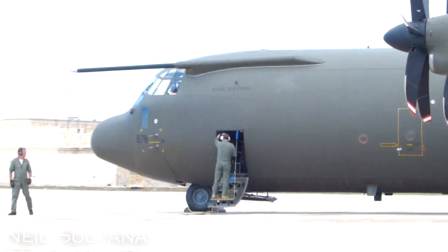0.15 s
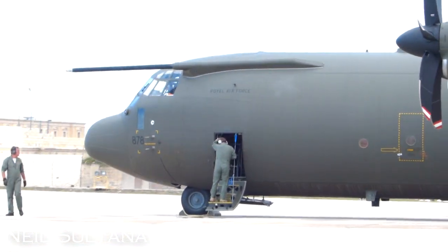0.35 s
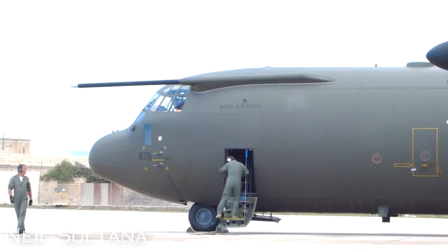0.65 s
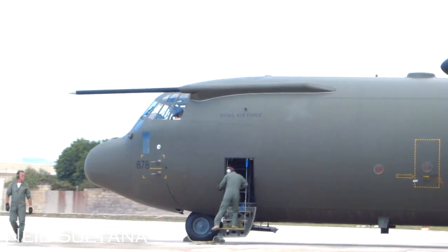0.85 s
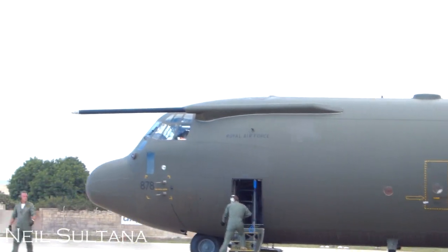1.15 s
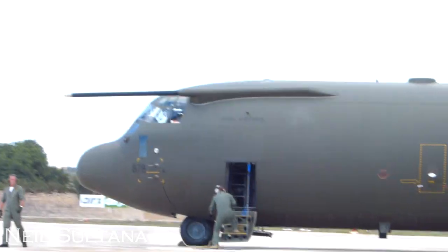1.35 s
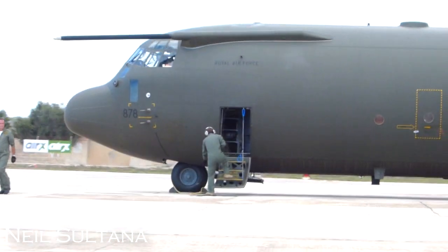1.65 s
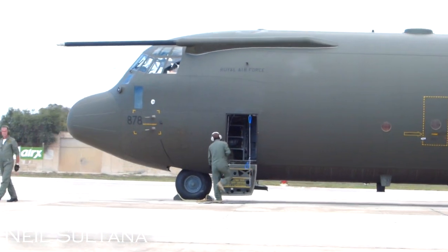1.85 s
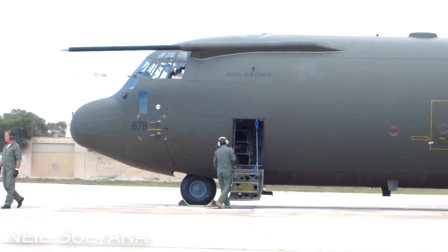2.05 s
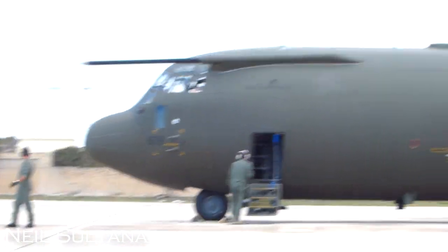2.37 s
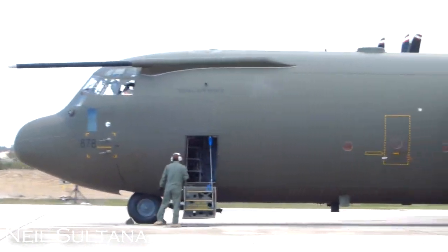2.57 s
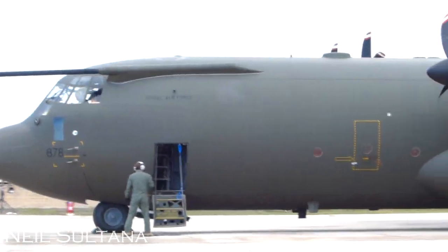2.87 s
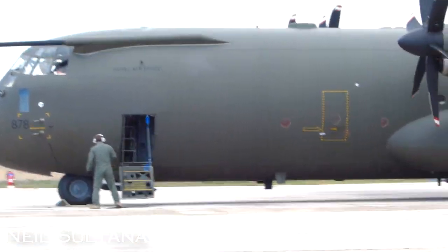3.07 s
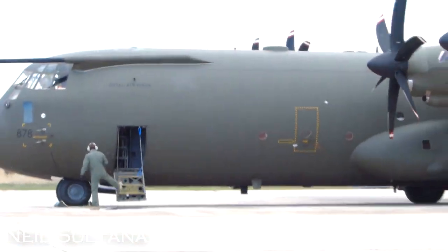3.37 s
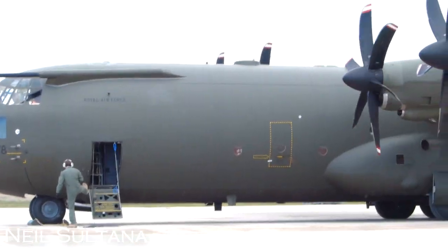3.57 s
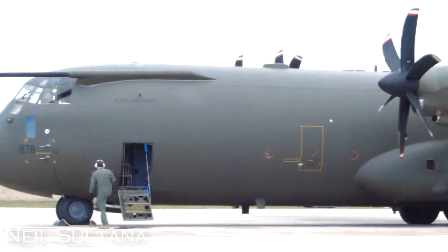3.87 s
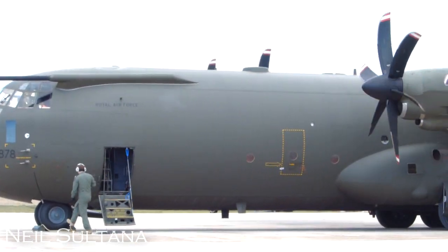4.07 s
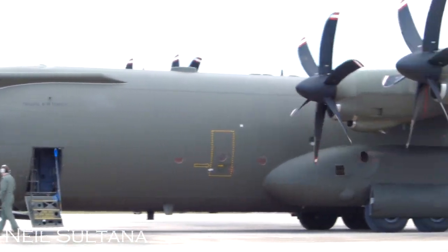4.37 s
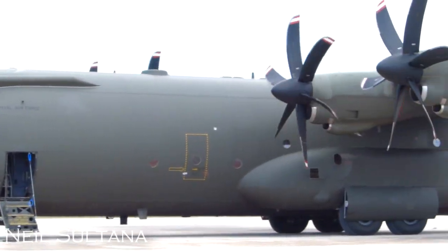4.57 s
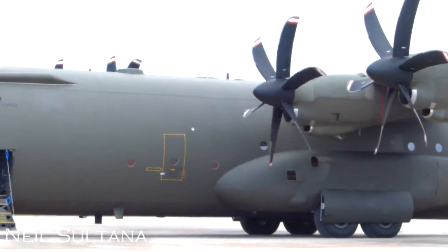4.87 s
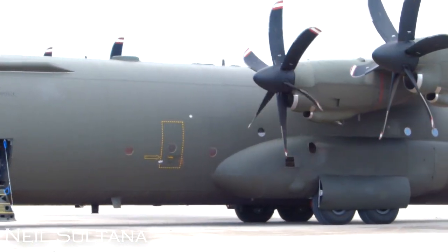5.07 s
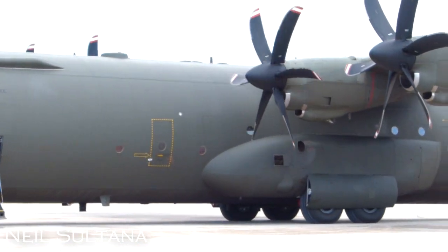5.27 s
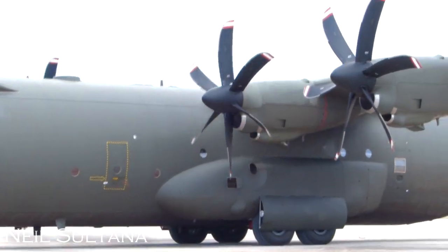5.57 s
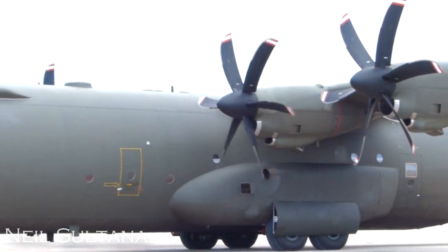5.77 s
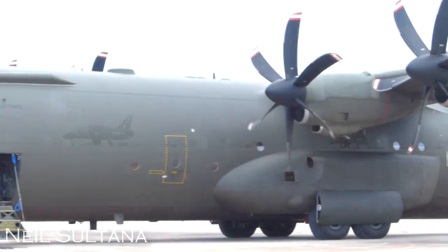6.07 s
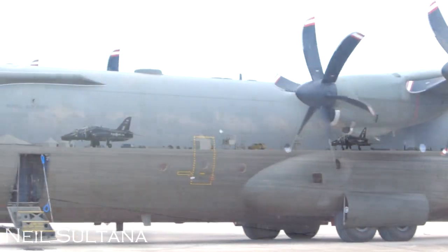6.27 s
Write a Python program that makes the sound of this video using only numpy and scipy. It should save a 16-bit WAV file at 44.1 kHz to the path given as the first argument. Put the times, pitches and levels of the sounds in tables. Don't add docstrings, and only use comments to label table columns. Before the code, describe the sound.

Continuous idling turbine noise outdoors: several shrill, shimmering tones close together, wind-stirred hiss, dense casing noise and a soft low roar. Individual whistles briefly jump out and sink back as warm air drifts. Low hums swell faintly. Near the end it dissolves partly into a second, closer jet with fuller noise and piercing steady whistles. Open apron, single microphone, almost centred, little stereo width, no echoing room.

```python
import sys
import numpy as np
from scipy import signal
from scipy.fft import rfft, irfft, next_fast_len
from scipy.io import wavfile
from scipy.ndimage import uniform_filter1d

SR = 44100
rng = np.random.default_rng(int(sys.argv[2]) if len(sys.argv) > 2 else 0)


def store_wav(level_fs):
    pcm = np.round(np.clip(np.atleast_2d(level_fs), -1, 1) * 32767)
    wavfile.write(sys.argv[1], SR, pcm.T.astype(np.int16))


def undo_db(level):
    steps = np.asarray(level, float) / 20
    return 10 ** steps


N = 283563
T_S = np.arange(N) / SR
HOP = 256
WINDOW = 4 * HOP
HZ = np.maximum(np.arange(2 * HOP + 1) * SR / WINDOW, 10)[:, None]
FRAMES_S = np.arange(N // HOP + 2) * HOP / SR

# t/s, view (0 nose - 1 abeam exhaust)
VIEW = [
    (0, 0.18),
    (1.3, 0.067),
    (2.6, 0.23),
    (3.5, 0.21),
    (4.4, 0.57),
    (5.4, 0.71),
    (5.93, 1.0),
    (6.43, 0.44),
]
# t/s, f/Hz
BLADE_HZ = [(0, 10692), (.44, 10687), (.88, 10673), (1.32, 10675), (1.76, 10669), (2.2, 10665),
            (2.64, 10669), (3.08, 10683), (3.52, 10690), (3.96, 10694), (4.4, 10701), (4.84, 10704),
            (5.28, 10709), (5.72, 10702), (6.43, 10699)]
# multiple, level at nose/dB, gain abeam/dB, scatter
STEADY = [(1, -62, 1, 0.39), (2, -52, 7, 0.58), (3, -50.5, 4.5, 0.55), (7, -52.5, -5, 0.66),
          (8, -41, -3.5, 0.52), (9, -39, -1, .6), (10, -36.5, -3.5, 0.54)]
# multiple, level/dB
UPPER = [(11, -47), (12, -54), (13, -65)]
# t/s, multiple, peak level/dB, length/s
FLARES = [(1.9, 7, -29.5, 0.18), (2.45, 7, -35, 0.24), (2.86, 7, -30, 0.067), (3.15, 7, -34, 0.24),
          (3.62, 7, -35, 0.15), (3.98, 7, -31, 0.23), (5.15, 7, -35, 0.41), (5.8, 7, -32, 0.26),
          (6.2, 7, -33, 0.33), (.01, 8, -22, 0.087), (.3, 8, -31, 0.2), (.55, 8, -30, 0.17),
          (.88, 8, -48, .1), (1.25, 8, -36, 0.33), (1.68, 8, -30, 0.23), (2.53, 8, -32, 0.3),
          (2.9, 8, -32, 0.16), (3.57, 8, -39, 0.17), (4.87, 8, -43, 0.29), (5.34, 8, -28, 0.26),
          (6.25, 8, -31, 0.38), (1.3, 9, -46, 0.25), (1.6, 9, -31, 0.25), (2.09, 9, -34, 0.046),
          (2.48, 9, -29, 0.39), (2.95, 9, -25.5, 0.11), (3.19, 9, -26.5, 0.092), (3.65, 9, -34, 0.38),
          (4.18, 9, -55, 0.073), (5.94, 9, -27, 0.05)]
# t/s, multiple, peak level/dB, length/s
LOW_FLARES = [(0.255, 1, -44, .2), (.95, 1, -51, .2), (1.51, 1, -43.5, 0.17), (2.702, 1, -47, 0.33),
              (.1, 2, -43, 0.14), (1.47, 2, -43, 0.11), (2.198, 2, -46, .4), (4.25, 2, -39.5, 0.18),
              (4.846, 2, -41.5, 0.75), (5.645, 2, -38, 0.11), (5.973, 2, -37, 0.21), (0.448, 3, -40, .12),
              (2.005, 3, -38, 0.48), (2.45, 3, -38, .2), (3.05, 3, -35.5, 0.4), (3.8, 3, -42, .25),
              (4.35, 3, -44, .3)]
# t/s, peak level/dB, length/s
BLADE_FLARES = [(.01, -30, .1), (0.22, -25.5, 0.11), (0.435, -25, 0.053), (0.827, -36, 0.31),
                (1.334, -36.5, .1), (1.56, -34, 0.16), (2.394, -38, 0.16), (3.422, -25.5, 0.11),
                (3.72, -34, 0.3), (4.03, -25, 0.18), (4.22, -40, 0.049), (4.43, -35, 0.12),
                (1.04, -27, 0.077), (4.605, -30, 0.064), (4.783, -27.5, 0.37), (5.177, -24, 0.11),
                (5.41, -23.5, 0.097), (6.132, -27, 0.23)]
# t/s, peak level/dB, length/s
GEAR_SWELLS = [
    (.9, -55, .9),
    (2.75, -50, .3),
    (4.3, -46, .6),
    (5.72, -46, .35),
]
# t/s, f/Hz, peak level/dB, length/s
HUM_SWELLS = [(0.306, 506.5, -46, 0.96), (0.94, 506.5, -48.5, 0.34), (3.8, 506.5, -50, 0.31),
              (5.75, 506.5, -48, 0.62), (0.653, 712, -46.5, 0.32), (1.703, 712, -53.5, 1.3),
              (2.91, 712, -51.5, 0.75), (3.765, 712, -44.5, 0.27), (5.763, 712, -54.5, 0.37),
              (.48, 476.5, -47, 0.14), (0.776, 476.5, -36.5, 0.11), (1.32, 476.5, -48, 0.45),
              (2.502, 476.5, -52, 0.75), (3.506, 476.5, -58, 0.38), (4.405, 476.5, -48.5, 0.093),
              (6.045, 476.5, -56, 0.38)]
# f/Hz, level/dB per Hz
ROAR_COLOUR = [(35, -73), (60, -59), (138, -14.5), (172, -14.5), (256, -1.5), (346, -7.5), (488, 0),
               (542, -2.5), (724, -4), (918, -4), (1080, -7), (1210, -19), (1400, -23), (1820, -40),
               (3080, -120)]
# f/Hz, width/Hz, level/dB
PIPE = [(143, 24, 7), (182, 14, -6), (203, 9.8, 5), (261, 16, 5.5), (343, 44, -1.5), (637, 20, -1.5),
        (909, 27, -18), (926, 30, -2)]
# f/Hz, level/dB per Hz
CASING_COLOUR = [(710, -66), (1200, -22.5), (1700, -5.5), (1950, -4), (2220, -5.5), (2560, -5), (3100, -3),
                 (4490, -2.5), (6600, -4), (8580, -9), (14500, -120)]
CASING_ABEAM_DB = (9, -1.5, 4.5)
# f/Hz, width/Hz, level/dB
PANELS = [(2766, 40, 5.5), (3260, 110, -0.5)]
# f/Hz, width/Hz, level/dB
DARK = [(946, 17, -2.5), (1194, 24, -13), (1947, 57, -6), (2320, 41, 3.5)]
# t/s, lag/ms, strength (0-1)
GROUND = [(0, 0.39, 0.05), (1.2, 0.31, 0.04), (2.0, 0.43, 0.2), (2.6, 0.34, 0.21), (3.4, 0.32, 0.26),
          (4.3, 0.34, 0.25), (5.3, 0.36, 0.2), (6.0, 0.38, 0.12), (6.43, 0.5, 0.27)]
# start t/s, end t/s, start f/Hz, end f/Hz, level/dB
COMBS = [(-0.5, 0.37, 1350, 1300, 15), (0, 1.26, 1660, 1680, 7), (0, 1.5, 3040, 3050, 9.5),
         (0, 1.5, 2430, 2740, -11), (0.5, 2.9, 2620, 2620, -10), (1.1, 1.14, 2350, 2400, 8),
         (1.85, 2.42, 1610, 1620, 9.5), (2.2, 2.47, 2930, 3110, 11), (2.1, 2.65, 2290, 2420, 7),
         (2.6, 3.5, 2420, 2420, 10.5), (0.2, 1.1, 1350, 1330, 9), (4, 5.2, 1250, 1300, -3),
         (4.5, 5.2, 1830, 1700, 4), (0.5, 0.55, 1940, 1670, -7), (4, 4.95, 1750, 1800, 5.5),
         (1.5, 2.9, 2750, 2870, -11), (2.45, 3.22, 1060, 1170, 9), (3, 4.2, 3100, 3070, 7),
         (3.5, 5, 2270, 2250, 7), (5.45, 6.9, 2265, 2240, 9), (3, 3.7, 1650, 1540, -5),
         (2, 4.2, 1900, 1930, -9), (4.5, 6.1, 2010, 1900, -6), (5.1, 6.5, 2400, 2400, -5),
         (0.6, 0.91, 2790, 2760, 6), (2, 2.3, 2740, 2800, 5), (2, 3.6, 2300, 2690, -7),
         (5, 6.2, 1940, 1770, 3.5), (5.3, 5.9, 2700, 2690, 4), (-1.5, 1, 3740, 3770, 8),
         (2, 1.6, 4600, 3900, 6), (2, 3.8, 4100, 3770, 6), (3, 3.05, 3000, 5300, 6),
         (1, .95, 4150, 4280, 9), (0.1, 1.5, 3330, 3440, 5.5), (2, 2.85, 1850, 1840, 4),
         (6, 7.3, 1200, 1200, 6), (5, 3, 2790, 2800, 6), (2, 2.9, 3600, 3660, 5)]
# start t/s, end t/s, f/Hz, width/Hz, level/dB
SHADES = [(1.2, 1.56, 3900, 290, 8), (1.1, 1.7, 4240, 320, -6), (1.8, 2.24, 3870, 360, -4.5),
          (0.5, 3.7, 4600, 230, -3.5), (4.5, 6.07, 3470, 380, -3.5), (4.5, 8.1, 2650, 200, 2.5),
          (-2, 1.25, 5200, 350, 8), (2, 2.82, 4900, 400, 3), (4.5, 5.3, 5400, 450, 4),
          (5, .6, 3100, 570, 5), (6, 6.2, 2150, 130, 1.5), (3.05, 3.39, 6400, 1900, 5),
          (0.5, 1.63, 140, 290, 3), (4, 6.05, 996, 150, -12), (0.5, 0.33, 1600, 560, 5),
          (0.5, 1.5, 2850, 320, -3.5), (0, 0.52, 650, 260, 6), (6, 6.1, 560, 700, 2.5),
          (5.0, 5.55, 4500, 120, -7), (3.8, 4.6, 3500, 130, -4), (5.5, 6.25, 3900, 520, -4),
          (1, 0.94, 2880, 200, 2.5), (1, 2.45, 2720, 290, 3.5), (4.2, 4.8, 3050, 90, 6),
          (5.0, 5.8, 400, 800, -3), (.5, 1.1, 5360, 300, -3), (3.5, 3.5, 2920, 100, -5),
          (5.7, 6.5, 1140, 180, 5), (4.5, 6.0, 5860, 620, -4.5), (5, 7.7, 4850, 330, 2),
          (1, 1.03, 4200, 1000, 3), (-0.3, 2.1, 2700, 400, 3)]
# f/Hz, level/dB per Hz
HISS_COLOUR = [(3530, -38.5), (6000, -18.5), (7100, -8), (8290, -1), (9900, -1.5), (10350, -2.5),
               (10800, 2), (11200, -5.5), (13200, -12), (15600, -26)]
# start t/s, end t/s, f/Hz, width/Hz, level/dB
HISS_SHADES = [(5, 6.1, 14300, 1600, 5), (0, 2.2, 14500, 1600, -2), (1.5, 5, 6800, 730, 7),
               (3, 3.35, 8800, 2500, 4), (3.5, 4.35, 12700, 2900, -4), (0.8, 1.5, 7400, 900, -2.5),
               (1, 6.0, 6300, 900, -3), (5.3, 6.1, 8600, 700, -3), (5.55, 5.95, 11800, 1500, -4),
               (2, 2.6, 12400, 2500, -6), (6, 7.9, 7000, 500, 2), (2.5, 2.95, 12000, 2800, 4),
               (1, 1.45, 12400, 1500, 2), (.8, 0.98, 11000, 3000, 2.5)]
# t/s, level/dB
WIND = [(0.0, -24), (0.09, -25.5), (0.61, -21.5), (0.79, -28), (0.99, -22.5), (1.47, -27.5), (1.61, -21),
        (2.26, -28), (2.35, -21.5), (2.69, -26), (3.42, -22.5), (3.87, -24.5), (4.01, -21.5), (4.14, -22.5),
        (5.35, -22.5), (5.73, -26), (6.18, -22.5), (6.43, -20.5)]
# t/s, level/dB
GUSTS = [(.61, 1), (.82, -2), (.88, 5.5), (1.048, 1), (1.14, 2), (1.31, 2), (2.65, 6.5), (2.721, -7),
         (2.78, 4.5), (4.17, -5.5), (4.25, -2.5)]
# t/s, level/dB
JET_FADE = [
    (0, -94),
    (5.9, -70),
    (5.98, -44),
    (6.05, -35),
    (6.14, -31),
    (6.28, -26.5),
    (6.43, -26.5),
]
# f/Hz, level/dB per Hz
JET_COLOUR = [(30, -42), (70, -22), (394, -8.5), (1340, -12.5), (2110, -9), (3030, -25), (4800, -5),
              (6600, -13), (8500, -14), (10800, -6), (15500, -26)]
JET_HZ = (393, 786, 2013, 3871, 4156, 4174, 4323, 4786, 5373, 5895, 6090, 6234, 7827)
JET_TONES_DB = (-17.5, -21, -13, -7, -1.5, -16, -15, -17, -26, -18, -14, -15, -12)
# t/s, low f/Hz, high f/Hz
SPLIT = [(.247, 5680, 6890), (.247, 9650, 13780), (.572, 13780, 15160), (.967, 5170, 7580),
         (.967, 13090, 15160), (1.594, 6890, 8270), (1.594, 12400, 13780), (2.058, 4220, 5680),
         (2.662, 6890, 8270), (3.08, 9650, 11710), (3.08, 13780, 15740), (3.289, 4220, 5680),
         (3.289, 6890, 8270), (3.289, 13780, 15160), (3.846, 5170, 6890), (3.87, 9650, 11020),
         (3.986, 4220, 5170), (3.986, 6890, 8270), (3.986, 14470, 15740), (4.264, 6290, 8270),
         (4.264, 13090, 14470), (4.566, 8960, 10340), (4.566, 13090, 14470), (6.238, 9650, 12400),
         (6.401, 5170, 6290), (6.401, 8960, 11710)]
SPLIT_HOP, SPLIT_START = 1024, 664

GEAR_HZ, GEAR_DB = 4059, -56
HUM_HZ, ACCESSORY_HZ, DUCT_HZ = 506.5, 712, 476.5
ROAR_DB, ROAR_ABEAM_DB = -41, -0.5
GUST_S, HISS_TRIM_DB = 0.042, -2.5
TOP_RESISTS = 0.27
COMB_WIDE_HZ = 74
DISSOLVE_S, DISSOLVE_DB = 6.12, -1.5


def rms_one(x):
    return x / np.sqrt(np.mean(np.abs(x) ** 2) + 1e-20)


def columns(rows, at_s=T_S):
    s, *rest = np.transpose(rows)
    return [np.interp(at_s, s, c) for c in rest]


def fine(slow):
    return np.interp(T_S, FRAMES_S, slow)


def bell(s, length_s):
    return np.exp(-2 * ((FRAMES_S - s) / length_s) ** 2)


def colour(points):
    hz, db = np.transpose(points)
    return np.interp(np.log(HZ), np.log(hz), db)


def bumps(rows, at_hz=HZ):
    return sum(db * np.exp(-2 * ((at_hz - hz) / width_hz) ** 2) for hz, width_hz, db in rows)


def sweeps(narrow, broad):
    rows = [(*row[:4], COMB_WIDE_HZ, row[4]) for row in narrow]
    rows += [(start, end, hz, hz, width_hz, db) for start, end, hz, width_hz, db in broad]
    out_db = 0
    for start, end, start_hz, end_hz, width_hz, db in rows:
        present = np.clip(np.minimum(FRAMES_S - start, end - FRAMES_S) / .15 + .5, 0, 1)
        centre_hz = np.interp(FRAMES_S, [start, end], [start_hz, end_hz])
        out_db = out_db + db * present * np.exp(-2 * ((HZ - centre_hz) / width_hz) ** 2)
    return out_db


def patches(wide_hz, long_s):
    field = rng.standard_normal((len(HZ), len(FRAMES_S)))
    bins = max(1, round(wide_hz * WINDOW / SR))
    frames = max(1, round(long_s * SR / HOP))
    for _ in range(2):
        field = uniform_filter1d(field, bins, axis=0)
        field = uniform_filter1d(field, frames, axis=1)
    return rms_one(field)


def noise(shape_db, level_db):
    white = rng.standard_normal(N + HOP)
    frames = signal.stft(white, nperseg=WINDOW, noverlap=3 * HOP)[2][:, :len(FRAMES_S)]
    shaped = frames * rms_one(undo_db(shape_db)) * undo_db(level_db)
    return signal.istft(shaped, nperseg=WINDOW, noverlap=3 * HOP)[1][:N]


def drift(rate_hz):
    step = 40
    r = np.exp(-2 * np.pi * rate_hz * step / SR)
    white = rng.standard_normal((2, N // step + 2002))
    slow = signal.lfilter([1], [1, -2 * r, r * r], white)[:, 2000:]
    return np.interp(np.arange(N) / step, np.arange(slow.shape[1]), rms_one(slow[0] + 1j * slow[1]))


def tone(hz, db, scatter, skirt_hz, waver=1):
    cycles = np.cumsum(hz * np.ones(N)) / SR + rng.random()
    carrier = np.exp(2j * np.pi * cycles)
    return np.sqrt(2) * undo_db(db) * np.real(carrier * (waver + scatter * drift(skirt_hz)))


def wind():
    return columns(WIND, FRAMES_S)[0] + sum(db * bell(s, GUST_S) for s, db in GUSTS)


def whine():
    shaft_hz, view = columns(BLADE_HZ)[0] / 10, columns(VIEW)[0]
    flares = FLARES + LOW_FLARES + [(s, 10, db, length_s) for s, db, length_s in BLADE_FLARES]
    gear = undo_db(GEAR_DB) + sum(undo_db(db) * bell(s, length_s) for s, db, length_s in GEAR_SWELLS)
    out = fine(gear) * tone(GEAR_HZ, 0, .7, 14, waver=1 + .4 * drift(4))
    for multiple, nose_db, abeam_db, scatter in STEADY:
        level = undo_db(nose_db + abeam_db * view ** 2) * undo_db(2.5 * drift(6.5).real)
        flare = 0 * FRAMES_S
        for s, k, db, length_s in flares:
            if k == multiple:
                flare = flare + undo_db(db - 6) * bell(s, length_s)
        if multiple > 3:
            skirt_hz, waver = 110, .95 + .75 * drift(26)
        else:
            skirt_hz, waver = 40, 1 + .3 * drift(8)
        out += (level + fine(flare)) * tone(multiple * shaft_hz, 0, scatter, skirt_hz, waver)
    gust_db = fine(wind()) + 25.37
    for multiple, db in UPPER:
        out += tone(multiple * shaft_hz, db + gust_db, scatter=1, skirt_hz=90, waver=drift(6.7))
    return out


def hums():
    out = 0
    for hz, scatter, skirt_hz in ((HUM_HZ, .14, 1.3), (ACCESSORY_HZ, .14, 1.3), (DUCT_HZ, 1.1, 22)):
        swells = [row for row in HUM_SWELLS if abs(row[1] / hz - 1) < .03]
        level = sum(undo_db(db) * bell(s, length_s) for s, _, db, length_s in swells)
        out = out + fine(level) * tone(hz, -1.2, scatter, skirt_hz)
    return out


def roar(echoes_db):
    level_db = ROAR_DB + ROAR_ABEAM_DB * columns(VIEW, FRAMES_S)[0]
    eddies_db = 0.93 * patches(90, 0.24) + 0.63 * patches(1500, 0.11)
    body = noise(colour(ROAR_COLOUR) + echoes_db + eddies_db, level_db)
    size = next_fast_len(N)
    fine_hz = np.arange(size // 2 + 1) * SR / size
    low_cut = 1 / np.sqrt(1 + (120 / (fine_hz + 1)) ** 6)
    return irfft(rfft(body, size) * undo_db(bumps(PIPE, fine_hz)) * low_cut, size)[:N]


def casing(echoes_db):
    gains_db = np.outer(CASING_ABEAM_DB, columns(VIEW, FRAMES_S)[0])
    held_hz = np.clip(HZ, 1900, 5300)
    near = [np.clip(1 - np.abs(np.log(held_hz / hz)) / np.log(1.7), 0, 1) for hz in (1900, 3250, 5300)]
    swing_db = sum(w * (db - db.mean()) for w, db in zip(near, gains_db)) / sum(near)
    lag_ms, strength = columns(GROUND, FRAMES_S)
    echo = np.clip(strength, 0, .9) * np.exp(-2j * np.pi * HZ * lag_ms / 1000)
    comb_db = 20 * np.log10(np.abs(1 + echo))
    shape_db = colour(CASING_COLOUR) + bumps(PANELS) + echoes_db + comb_db
    streaks_db = 1.1 * patches(70, .5)
    return noise(shape_db + swing_db + streaks_db + 0.7 * patches(1500, .04), -28)


def hiss():
    level_db = wind()
    top = np.clip((HZ - 10500) / 2500, 0, 1)
    tilt_db = -top * TOP_RESISTS * (level_db - level_db.mean())
    eddies_db = 1.28 * patches(9000, 0.085) + 0.96 * patches(1670, .03) + patches(400, 0.14)
    shape_db = colour(HISS_COLOUR) + tilt_db + eddies_db + sweeps([], HISS_SHADES)
    return noise(shape_db, level_db + HISS_TRIM_DB)


def jet():
    whistles = sum(tone(hz, db, scatter=.08, skirt_hz=8) for hz, db in zip(JET_HZ, JET_TONES_DB))
    rush = noise(colour(JET_COLOUR) + 3.5 * patches(300, 0.08), 0)
    return undo_db(columns(JET_FADE)[0]) * (rush + whistles)


def scene():
    echoes_db = bumps(DARK) + sweeps(COMBS, SHADES)
    fade = undo_db(np.interp(T_S, [DISSOLVE_S, N / SR], [0, DISSOLVE_DB]))
    turbine = whine() + hums() + roar(echoes_db) + casing(echoes_db) + hiss()
    return np.tile(fade * turbine + jet(), (2, 1))


def split(mono):
    length = 2 * SPLIT_HOP
    out, at = np.zeros((2, N + length)), np.arange(length) + .5
    window = np.sin(np.pi * at / length)
    for s, low_hz, high_hz in SPLIT:
        start = SPLIT_START + SPLIT_HOP * round((s * SR - SPLIT_START) / SPLIT_HOP - 1)
        bins = np.arange(round(low_hz * length / SR), round(high_hz * length / SR)) + .5
        basis = window * np.cos(np.pi / SPLIT_HOP * np.outer(bins, at + SPLIT_HOP / 2))
        was = basis @ mono[start:start + length]
        new = np.sqrt(uniform_filter1d(was ** 2, size=32)) * rng.standard_normal((2, len(bins)))
        out[:, start:start + length] += (new - was) @ basis * 2 / SPLIT_HOP
    return out[:, :N]


def top_cut(x):
    return signal.sosfilt(signal.butter(12, 15720, fs=SR, output="sos"), x)


def record(dry):
    mix = dry + split(dry[0])
    return top_cut(mix)


dry = scene()
out = record(dry)
store_wav(out)
```